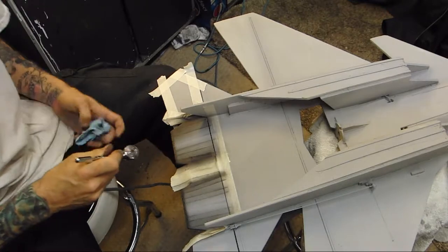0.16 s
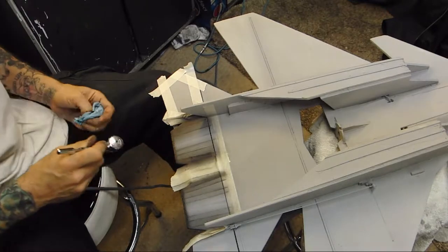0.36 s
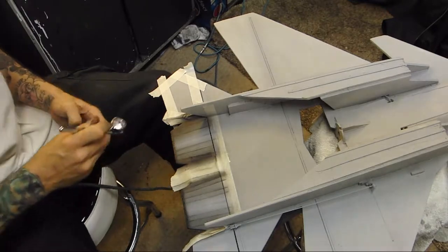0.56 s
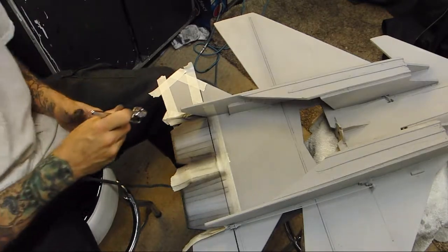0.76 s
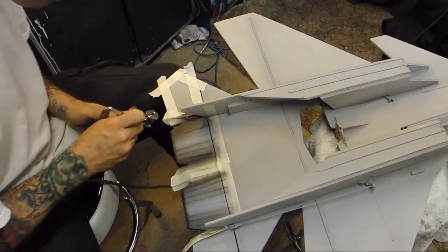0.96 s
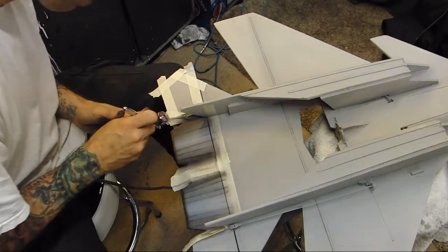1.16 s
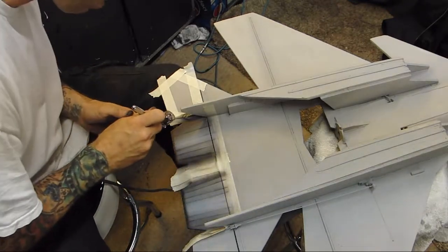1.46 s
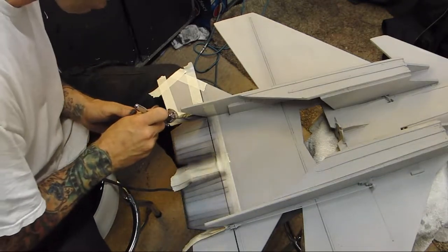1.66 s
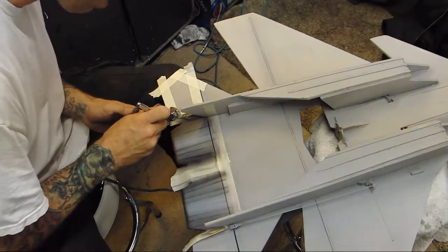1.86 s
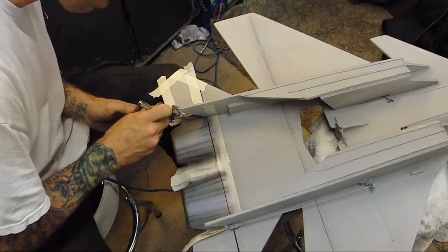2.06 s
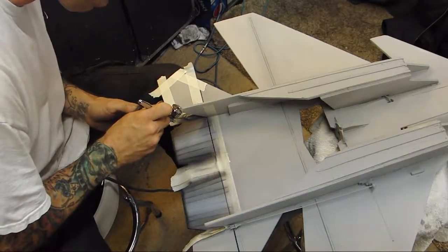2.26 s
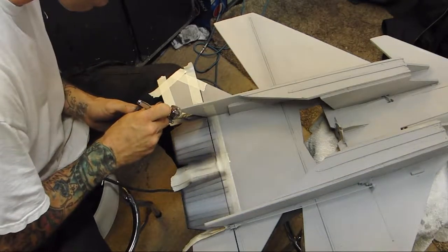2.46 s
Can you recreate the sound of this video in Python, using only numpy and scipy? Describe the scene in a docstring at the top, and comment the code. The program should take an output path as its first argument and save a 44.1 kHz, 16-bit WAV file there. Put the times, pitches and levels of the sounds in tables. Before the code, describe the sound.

Airbrush hiss starts abruptly in a quiet workshop and swells into a rushing spray on plastic.

```python
"""Airbrush on a large model

In a quiet workshop, fingers tick on the grip, then the air valve opens with a knock and a spurt of
noise that settles to a thin, high hiss. Paint adds a fine fizz of fluttering noise. As the nozzle
closes in, the jet strikes the model: a roar of noise swells, coloured by the shell's resonances, and
the hollow part rings with it. Sparse echoes come back from bench and walls over a steady room wash."""
import sys
import numpy as np
from scipy import signal
from scipy.fft import rfft, irfft
from scipy.io import wavfile

SR = 44100
rng = np.random.default_rng(int(sys.argv[2]) if len(sys.argv) > 2 else 0)


def pcm_store(signal):
    """Save signal as 16-bit PCM."""
    levels = np.round(np.clip(np.atleast_2d(signal), -1, 1) * 32767)
    wavfile.write(sys.argv[1], SR, levels.astype(np.int16).T)


N = 114660
T = np.arange(N) / SR  # seconds
HZ = np.fft.rfftfreq(N, 1 / SR) + 1  # 1 Hz up, so that the logarithm exists at zero

VALVE_S, OPEN_S = 0.907, 0.0039  # the air valve starts to open, and the time it takes
AGE = np.maximum(T - VALVE_S, 0)  # seconds since the valve started to open
OPENING = np.minimum(AGE / OPEN_S, 1)  # 0 shut, 1 fully open

# Resonances of the model under the jet. Each row: centre in Hz, width in Hz, lift in dB.
SHELL_MODES = [(929, 53, 5.5), (1293, 59, 3), (1612, 27, 7), (1881, 32, 8.5), (2060, 17, 3.5),
               (2180, 15, 5), (2320, 26, 5.5), (2440, 28, 4.5), (2530, 31, 2), (2890, 25, 0.5),
               (3075, 120, 3.5), (3316, 69, 4), (3420, 23, 5.5), (3604, 37, 7), (3795, 22, 4.5),
               (4220, 39, 4)]
# The hollow part's main resonance. Each row: centre in Hz, width in Hz, lift in dB.
HOLLOW_MODE = [(771, 24, 10.5)]
# Dips of the microphone housing, at full strength. Each row: centre in Hz, width in Hz, change in dB.
HOUSING_DIPS = [(4084, 210, -16), (6230, 670, -13), (7840, 320, -11), (10190, 480, -11)]


def amp(db):
    """Decibels to gain."""
    return 10 ** (np.asarray(db) / 20)


def unit(x):
    """Scales to rms 1."""
    return x / np.sqrt(np.mean(x ** 2) + 1e-20)


def curve(points):
    """Joins (seconds, value) rows by straight lines over time."""
    return np.interp(T, *np.transpose(points))


def slope(points):
    """Joins (Hz, dB) rows by straight lines on a log-frequency axis."""
    hz, db = np.transpose(points)
    return np.interp(np.log(HZ), np.log(hz), db)


def bumps(rows):
    """Response in dB of a set of resonances or dips, each a bell around its centre."""
    return sum(db / (1 + (2 * (HZ - hz) / width) ** 2) for hz, width, db in rows)


def colour(x, db):
    """Filters by a response in dB, without delay."""
    taps = np.roll(irfft(amp(db), N), N // 2)
    return signal.fftconvolve(x, taps)[N // 2:][:N]


def noise(db):
    """Random noise of rms 1 whose spectrum has the given shape in dB."""
    white = rng.standard_normal(N)
    return unit(irfft(rfft(white) * amp(db), N))


def flutter(depth_db, rate_hz):
    """Random gain of turbulent air: slow noise, low-passed at the rate, sways the level in dB."""
    low_pass = -10 * np.log10(1 + (HZ / rate_hz) ** 4)
    return amp(depth_db * noise(low_pass))


def room_wash():
    """The workshop's steady background: shaped noise with a faint whine, dipped by the housing."""
    # Each row: frequency in Hz, relative level in dB.
    room_spectrum = [(20, -10), (75, -0.5), (190, -3), (400, -7), (700, -11), (1500, -14), (2500, -14.5),
                     (3600, -18), (4400, -18), (4800, -11), (5200, -19), (7000, -24.5), (11000, -25),
                     (16000, -26.5)]
    # A faint steady whine. Each row: centre in Hz, width in Hz, lift in dB.
    whine = [(4800, 38, 5.5)]
    level_db = -57
    return amp(level_db) * noise(slope(room_spectrum) + bumps(whine + HOUSING_DIPS))


def handling():
    """Fingers shift on the airbrush: two faint, dull ticks of quickly fading noise."""
    # Each row: start in seconds, level in dB.
    ticks = [(.572, -51), (.580, -54.5)]
    # Each row: frequency in Hz, relative level in dB.
    tick_spectrum = [(300, -22), (1200, -12), (1900, 4), (2500, -4), (3500, -20), (10000, -40)]
    fade_s = 0.004
    strikes = sum(amp(db) * (T >= s) * np.exp(-abs(T - s) / fade_s) for s, db in ticks)
    return strikes * noise(slope(tick_spectrum))


def thump():
    """The pressure step of the opening valve: a soft low knock, a sine that dies away."""
    level_db, pitch_hz, fade_s = -43.5, 150, 0.014
    return amp(level_db) * np.sin(2 * np.pi * pitch_hz * AGE) * np.exp(-AGE / fade_s)


def valve():
    """Air flow: a quick opening, a spurt as stored hose pressure escapes, then steady at 1."""
    spurt_db, spurt_fade_s = 10, 0.068
    return OPENING * amp(spurt_db * np.exp(-AGE / spurt_fade_s))


def jet():
    """The free jet's thin hiss follows the air flow; a low puff and a bright spit mark its start."""
    # Spectra of hiss, puff and spit. Each row: frequency in Hz, relative level in dB.
    hiss_spectrum = [(60, -38), (350, -9.5), (800, -10.5), (1300, -15), (2200, -7.5), (3400, -3.5),
                     (5500, -7.5), (7000, -8.5), (9500, -9), (11000, -5.5), (12400, 2), (14000, -3),
                     (16000, -3)]
    puff_spectrum = [(30, -10), (150, 2), (380, 3), (700, 1), (1500, -15), (5000, -38)]
    spit_spectrum = [(3000, -20), (10500, -12), (12200, -6), (13300, -3), (15000, 3), (16000, -2)]
    hiss_db = -41  # once the flow is steady
    puff_db, puff_fade_s = -50, 0.056
    spit_db, spit_fade_s = -37, 0.057  # the first air leaves the nozzle extra bright
    puff = amp(puff_db) * np.exp(-AGE / puff_fade_s) * noise(slope(puff_spectrum))
    spit = amp(spit_db) * np.exp(-AGE / spit_fade_s) * noise(slope(spit_spectrum))
    hiss = amp(hiss_db) * valve() * noise(slope(hiss_spectrum))
    hiss = hiss * flutter(depth_db=0.5, rate_hz=150)
    return hiss + OPENING * (puff + spit)


def paint():
    """Paint tears into droplets at the needle: a fine, uneven fizz."""
    # Each row: frequency in Hz, relative level in dB.
    fizz_spectrum = [(1000, -20), (4000, 5), (5500, 0), (7000, -2.5), (9500, -6.5), (11000, 0),
                     (12700, 1.5), (14500, -1.5), (16000, -4)]
    start_s, pull_s, level_db = 1.323, 0.23, -36  # the trigger is drawn back for paint
    flow = np.clip((T - start_s) / pull_s, 0, 1)
    return amp(level_db) * flow * noise(slope(fizz_spectrum)) * flutter(depth_db=0.6, rate_hz=300)


def reach(points):
    """Gain of a level curve in dB, faded in from the valve's opening to the curve's first row."""
    fade_in = np.clip((T - VALVE_S) / (points[0][0] - VALVE_S), 0, 1) ** 2
    return amp(curve(points)) * fade_in


def hollow():
    """The wide edge of the jet blows across the hollow part, whose resonances colour the noise."""
    # Each row: time in seconds, level in dB.
    ring_level = [(1.0, -58.5), (1.1, -49.5), (1.21, -44.5), (1.33, -47), (1.55, -47.5), (1.85, -43.5),
                  (2.08, -43.5), (2.33, -45), (2.45, -43.5), (2.6, -46)]
    # Each row: frequency in Hz, relative level in dB.
    ring_spectrum = [(60, -18.5), (150, -13), (250, -16), (360, -7.5), (460, -15), (550, -3.5), (660, 0.5),
                     (735, -4), (830, -5.5), (1200, -8), (2500, -23)]
    ring = noise(slope(ring_spectrum) + bumps(SHELL_MODES + HOLLOW_MODE))
    return ring * reach(ring_level) * flutter(depth_db=0.53, rate_hz=30)


def roar():
    """Turbulence on the model's surface, tilted by the aim and coloured by the shell."""
    # Each row: time in seconds, level in dB before the tilt.
    roar_level = [(1.1, -60), (1.15, -50), (1.21, -38.5), (1.32, -37.5), (1.45, -34), (1.62, -30),
                  (1.78, -29.5), (1.92, -29), (2.03, -26), (2.14, -23.5), (2.23, -22), (2.28, -24.5),
                  (2.34, -27), (2.41, -22.5), (2.48, -24), (2.54, -26.3), (2.6, -27.8)]
    # Brightness as the aim changes. Each row: time in seconds, tilt in dB per octave.
    aim_tilt = [(1.15, -3), (1.3, -1), (1.55, 3.5), (1.7, 3), (1.9, -0.5), (2.03, -2.5), (2.22, 1.5),
                (2.35, 0.5), (2.47, 0.5), (2.6, -2)]
    # The jet's impact. Each row: frequency in Hz, relative level in dB.
    impact_spectrum = [(100, -37), (450, -34), (650, -23), (950, -9.5), (1450, -8), (1800, -4.5),
                       (2350, -0.5), (2750, -1.5), (3650, -2.5), (4400, -7.5), (5400, -9.5), (6200, -20.5),
                       (9000, -25.5), (16000, -35)]
    pivot_hz = 2620
    air = rfft(noise(slope(impact_spectrum) + bumps(SHELL_MODES + HOLLOW_MODE)))
    octave = np.clip(np.log2(HZ / pivot_hz), -1, 1)  # the tilt levels off an octave from the pivot
    tilt_db = curve(aim_tilt)
    tilted = 0
    for k in (-1, 0, 1):  # three overlapping bands: below, around and above the pivot
        band = irfft(air * np.maximum(1 - abs(octave - k), 0), N)
        tilted = tilted + band * amp(k * tilt_db)
    return tilted * reach(roar_level) * flutter(depth_db=0.3, rate_hz=100)


def reflections(x, count=160):
    """Short, sparse echoes from the bench and the walls, weaker the later they arrive."""
    t60_s = 0.13  # time to fall by 60 dB
    delay = rng.uniform(0.002, 0.09, count)  # seconds
    taps = np.zeros(N)
    taps[(delay * SR).astype(int)] = rng.choice([-1, 1], count) * amp(-60 * delay / t60_s)
    return signal.fftconvolve(x, taps / np.linalg.norm(taps))[:N]


def scene():
    """The airbrush and its echoes through the microphone housing, over room wash and grip ticks."""
    echo_db = -8.5
    dip_share = 0.8  # share of the housing's dips, in dB, that the spray and its echoes get
    spray = thump() + jet() + paint() + hollow() + roar()
    with_echoes = spray + amp(echo_db) * reflections(spray)
    heard = colour(with_echoes, dip_share * bumps(HOUSING_DIPS))
    return (room_wash() + handling() + heard)[None]


def record(dry):
    """The recorder's band limit: a steep low-pass."""
    edge_hz = 15780
    low_pass = signal.firwin(767, edge_hz, window=("kaiser", 9), fs=SR)
    return signal.oaconvolve(dry, low_pass[None], "same")


dry = scene()
out = record(dry)
pcm_store(out)
```